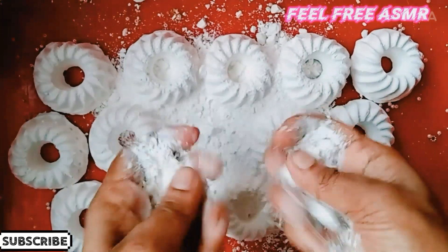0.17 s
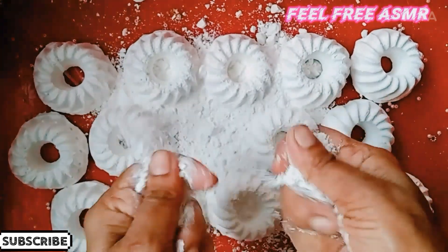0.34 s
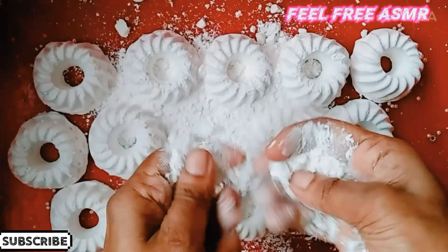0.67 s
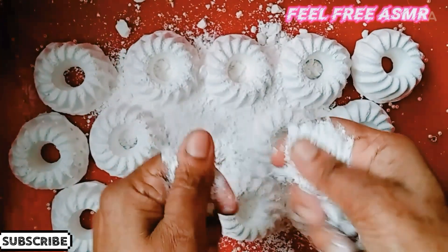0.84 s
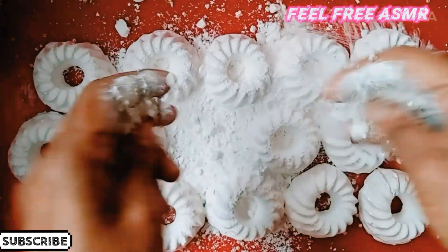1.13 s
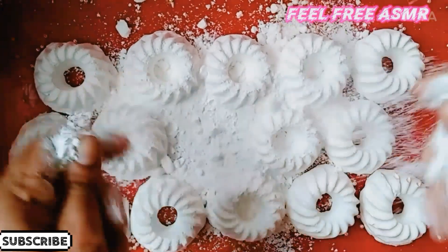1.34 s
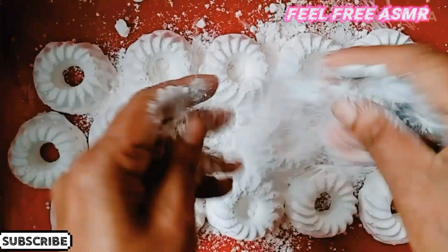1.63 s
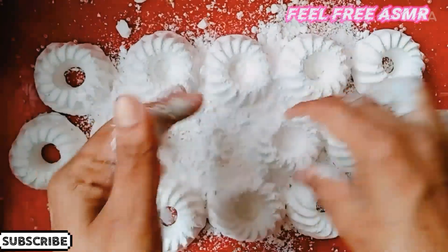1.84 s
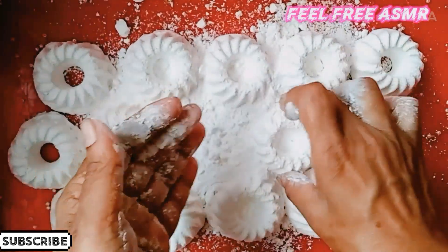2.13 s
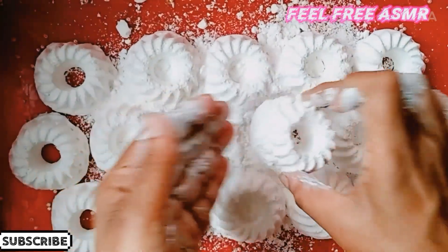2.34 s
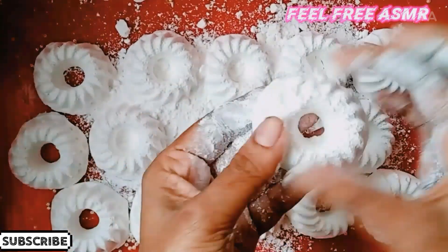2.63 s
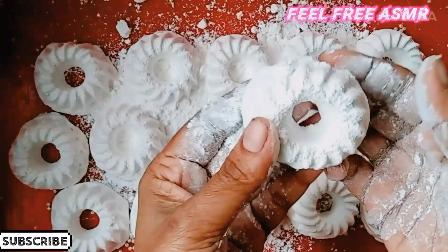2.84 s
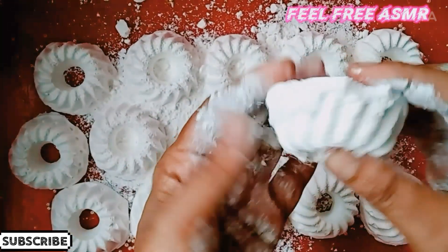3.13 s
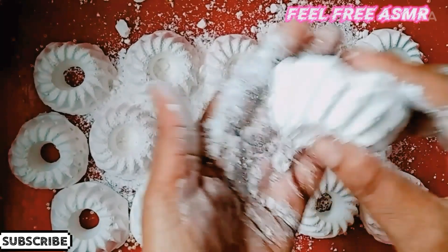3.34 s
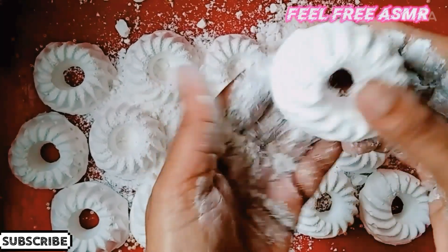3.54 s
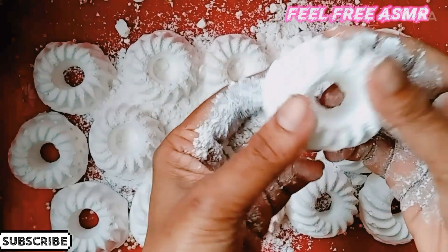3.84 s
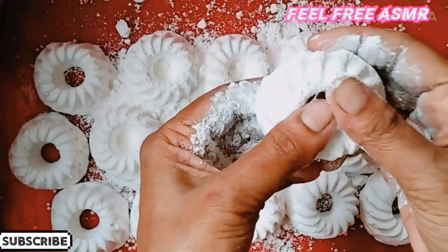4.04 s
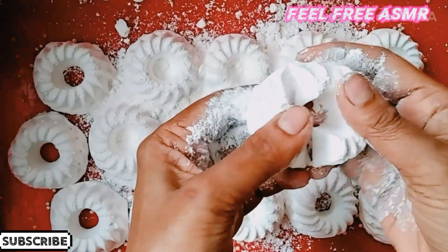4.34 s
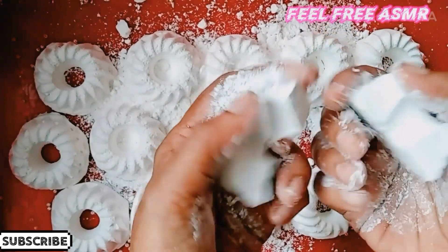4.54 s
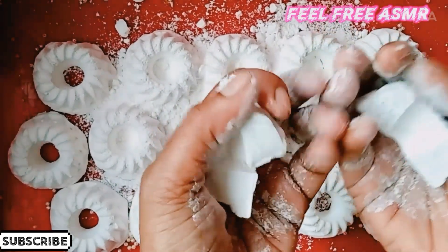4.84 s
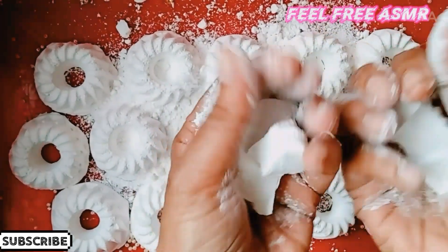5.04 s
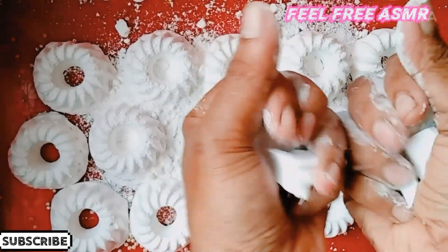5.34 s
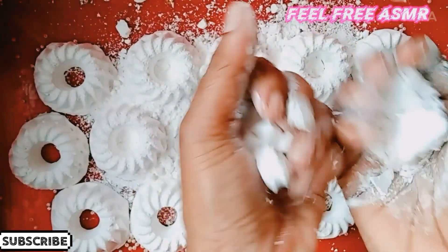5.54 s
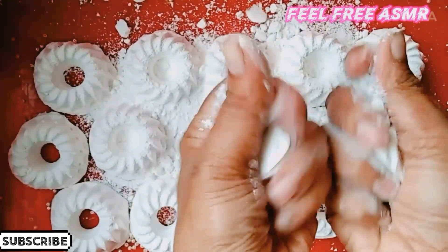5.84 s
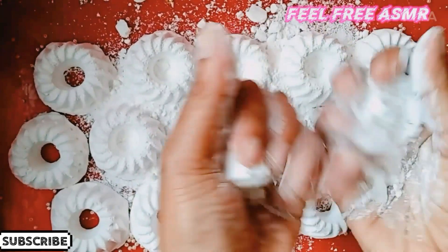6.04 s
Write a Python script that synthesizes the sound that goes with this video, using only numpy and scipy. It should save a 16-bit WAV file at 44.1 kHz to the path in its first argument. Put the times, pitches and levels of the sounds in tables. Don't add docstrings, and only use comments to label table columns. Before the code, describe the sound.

Irregular chalk crunches and plastic tray knocks come first, with gritty grinding and trickling crumbs. They stop, leaving steady high hiss and soft, whistling skin drags over ribbed chalk. A single break cracks midway, then rapid snapping and crackling bursts out, ending in loud hollow knocks and pattering grit. Close, dry indoor pickup with faint low hum.

```python
import sys
import numpy as np
from scipy import signal
from scipy.io import wavfile
from scipy.ndimage import uniform_filter1d

SR = 44100
rng = np.random.default_rng(int(sys.argv[2]) if len(sys.argv) > 2 else 0)


def natural_amplitude(level_db):
    exponent = np.asarray(level_db, float) / 20
    return 10 ** exponent


def transcribe(signal):
    frames = np.atleast_2d(signal).T
    limited = np.clip(frames, -1, 1)
    pcm = np.round(limited * 32767).astype(np.int16)
    wavfile.write(sys.argv[1], SR, pcm)


N = 272875

# [f/Hz, width/Hz, level/dB]
TRAY_MODES = [(555, 300, -14.5), (950, 87, 9.5), (1140, 83, -15)]
# [f/Hz, width/Hz, level/dB]
CHALK_MODES = [(1400, 500, 1), (1850, 550, 1), (2450, 700, -1), (3200, 900, -4), (4150, 900, -8)]
# [f/Hz, width/Hz, level/dB]
FIZZ_MODES = [(7500, 4030, 9), (9460, 3270, 9.5), (11830, 1100, 4), (14500, 1400, -22)]
# [t/s, knock peak/dB, crackle peak/dB, length/ms]
KNOCKS = [(.4917, -2, -17, 4.8), (0.5195, -13, -27, 2.7), (.527, -34, -28, 5.3), (0.5382, -24, -29, 8.2),
          (.6405, -10.5, -12.5, 2.96), (1.3194, -20, -12.5, 6.4), (1.3427, -16.5, -23, 1.6),
          (1.5838, -9.5, -9.5, 5.1), (1.8885, -9, -24, 6.3), (1.931, -22.5, -28.5, 17),
          (1.9541, -25, -28, 5), (2.0452, -8.5, -12.5, 3.5), (2.1134, -25.5, -24, 4.7),
          (2.178, -18, -28.5, 3.8), (2.188, -25, -39, 3.2), (2.1946, -23.5, -47, 4), (2.487, -17, -24, 2.4),
          (4.3, -11, -12, 1.6), (4.3036, -25.5, -36, 1.2), (5.217, -27, -20, 1.9), (5.315, -13, -8.5, 2.3),
          (5.4658, -11, -8, 1.27), (5.8468, -8, -18, 4.5), (5.858, -24, -45, 5.2),
          (5.9704, -28.5, -20, 1.9)]


def evened(x):
    return x / np.sqrt(np.mean(x ** 2) + 1e-20)


def read(points, hz):
    f, value = np.transpose(points)
    return np.interp(np.log(hz + 1), np.log(f + 1), value)


def level_course(rows):
    return np.interp(np.arange(N) / SR, *np.transpose(rows))


def add(mix, s, sound):
    part = mix[..., round(s * SR):][..., :sound.shape[-1]]
    part += sound[..., :part.shape[-1]]


def resonate(x, hz, width_hz):
    turn = np.exp(2j * np.pi * np.cumsum(hz * np.ones(x.shape[-1])) / SR)
    r = np.exp(-np.pi * width_hz / SR)
    return 2 * (turn * signal.lfilter([1 - r], [1, -r], x / turn)).real


def body(x, modes):
    out = 0
    for k, (hz, width_hz, db) in enumerate(modes):
        once = resonate(x, hz, width_hz)
        out = out + (-1) ** k * natural_amplitude(db) * resonate(once, hz, 1.7 * width_hz)
    return out


def lumps():
    # [t/s, crackle peak/dB, fizz peak/dB, length/ms, splinter f/Hz]
    snap_rows = [(.0066, -24, -44, 2.9, 1500), (0.042, -19, -54, 3.6, 1360),
                 (0.4511, -26.5, -36, 1.5, 2630), (0.6442, -9, -29, 1.7, 1720),
                 (1.387, -16, -26.5, 3, 1220), (1.473, -21, -22, 4.3, 2920),
                 (5.2645, -18.5, -52, 1.4, 3100), (5.286, -20, -50, 1.5, 2000),
                 (5.2913, -13.5, -37, 3.6, 2140), (5.2955, -24, -26, 3.4, 2470),
                 (5.3005, -14.5, -31, 1.2, 2320), (5.3356, -19, -52, 3.4, 1550),
                 (5.3458, -14.5, -48, 6.9, 1580), (5.3511, -8.5, -50, 1.2, 2300),
                 (5.36, -16.5, -54, 1.5, 1590), (5.395, -20.5, -50, 2, 2050), (5.3978, -27, -50, 3.4, 1440),
                 (5.4042, -27, -50, 3.3, 1610), (5.4306, -20, -36, 3.6, 2200),
                 (5.4401, -26, -35, 4.2, 1600), (5.4818, -21, -26.5, 1.8, 2300),
                 (5.9627, -34, -50, 3.3, 1820), (5.984, -32, -47, 1.8, 1600), (6.0107, -22, -50, 1.7, 1590)]
    # [t/s, peak/dB, f/Hz]
    chip_rows = [(.0468, -25, 1010), (0.0523, -31, 1140), (.263, -50, 1150), (0.2838, -34, 1180),
                 (.3075, -34, 1430), (.3125, -34, 795), (.362, -32, 810), (0.4226, -33.5, 890),
                 (0.704, -23, 630), (0.7085, -39, 485), (0.806, -38, 840), (0.8223, -38, 745),
                 (0.8903, -36, 830), (1.02, -32, 935), (1.178, -28, 970), (1.186, -29, 920),
                 (1.1924, -28, 870), (1.379, -36, 1270), (5.2606, -44, 1500), (1.5434, -31, 900),
                 (1.7323, -35, 1180), (1.7601, -32, 646), (1.787, -34.5, 770), (2.2013, -27, 450),
                 (2.491, -39, 1140), (2.8462, -32.5, 850), (2.892, -38, 750), (4.3126, -43, 1320),
                 (6.0062, -27, 890), (6.0655, -34, 820)]
    # [t/s, peak/dB, f/Hz]
    overtone_rows = [
        (0.6423, -28, 1220),
        (1.5852, -21, 1190),
        (2.0467, -15.5, 1750),
        (4.3014, -18.5, 1440),
        (5.318, -12, 2430),
        (5.8485, -8, 1170),
    ]
    knock_hz, knock_spread, knock_fizz_db = 870, .015, -21
    snap_knock_db = -6
    chip_ms, chip_crackle_db, chip_fizz_db = 3.1, -4.5, -17
    overtone_ms, overtone_crackle_db = 2.87, -34
    rows = []
    for s, db, crackle_db, ms in KNOCKS:
        hz = knock_hz * (1 + knock_spread * rng.standard_normal())
        rows.append((s, db, hz, crackle_db, crackle_db + knock_fizz_db, ms))
    for s, db, fizz_db, ms, hz in snap_rows:
        rows.append((s, db + snap_knock_db, hz, db, fizz_db, ms))
    for s, db, hz in chip_rows:
        rows.append((s, db, hz, db + chip_crackle_db, db + chip_fizz_db, chip_ms))
    for s, db, hz in overtone_rows:
        crackle_db = db + overtone_crackle_db
        rows.append((s, db, hz, crackle_db, crackle_db + knock_fizz_db, overtone_ms))
    return rows


def breaks():
    apart_low, apart_high = 0.065, 0.87
    out, t = np.zeros((2, N)), np.arange(900) / SR
    impulse = 1. * (t[None] == 0)
    tray, chalk, dust = (body(impulse, modes) for modes in (TRAY_MODES, CHALK_MODES, FIZZ_MODES))

    def ring(x, response):
        return signal.fftconvolve(x, response, axes=1)[:, :len(t)]

    lead = np.where(t < .0005, 1, .4)
    for s, knock_db, hz, crackle_db, fizz_db, ms in lumps():
        size, chance, grit = rng.standard_normal((3, 2, len(t)))
        cracks = size * (abs(chance) < .07)
        cracks[:, [8, 14]] = [[-1.38, 0.076], [-0.049, 0.48]]
        fading = np.exp(-(t / (1.07 * ms / 1000 + 1e-4)) ** 2)
        cracks, grit = cracks * fading, grit * fading
        blow, aside = cracks[0], cracks[1] * [[1], [-1]]
        low = lead * (blow + apart_low * aside)
        high = blow + apart_high * aside

        lump = body(low, [(hz, (60 + 600 / ms) * hz / 870, 0)])
        thump = body(low, [(hz, 900, -15)])
        knock = lump + thump + 0.14 * ring(low, tray)
        rise_ms = .025 * ms ** 2
        high = high * (1 - np.exp(-1000 * t / rise_ms))
        crackle = ring(high + .08 * grit, chalk)
        fizz = ring(high + .3 * grit, dust)
        for db, part in (knock_db + 2.5, knock), (crackle_db + 1.0, crackle), (fizz_db + 11.0, fizz):
            add(out, s, natural_amplitude(db) * part / abs(part.mean(0)).max())
    return out


def powder_flow():
    # [middle t/s, half length/s, grinding level/dB]
    squeeze_rows = [(.005, 0.071, -33.5), (0.325, 0.065, -36.5), (0.638, 0.18, -46), (1.182, 0.02, -39),
                    (1.38, 0.073, -36.5), (1.476, 0.24, -42), (1.727, 0.053, -42.5), (1.94, .03, -42),
                    (2.06, .03, -58), (2.11, .015, -40), (2.468, 0.037, -47), (5.318, 0.038, -31),
                    (5.412, 0.067, -34), (5.815, 0.075, -43), (5.968, 0.047, -41), (6.035, 0.035, -42)]
    # [t/s, level/dB]
    trickle_rows = [
        (0, -46),
        (1.03, -46),
        (1.1, -49.5),
        (1.6, -57),
        (1.85, -47),
        (2.2, -43.5),
        (2.3, -57.5),
        (5.15, -47),
        (5.7, -48.5),
        (6.19, -47.5),
    ]
    shower_db, shower_rise_s, shower_t60_s = -24, 0.0041, 0.36
    t, after = np.arange(N) / SR, np.arange(SR // 4) / SR
    trickle, squeeze, shower = natural_amplitude(level_course(trickle_rows)) ** 2, np.zeros(N), np.zeros(N)
    for s, half_s, db in squeeze_rows:
        squeeze += natural_amplitude(db) ** 2 * np.exp(-2 * abs(t - s) ** 1.53 / half_s ** 1.485)
    for s, db, *_ in KNOCKS:
        fall = natural_amplitude(db + shower_db - 60 * after / shower_t60_s)
        add(shower, s, (fall * (1 - np.exp(-after / shower_rise_s))) ** 2)
    tray = trickle * natural_amplitude(-1.0) + shower + squeeze
    palm = trickle + squeeze + shower * natural_amplitude(-35.5)
    return 10 * np.log10([tray, palm])


def crumbs():
    per_s, spread_db, clump_db = 2000, 5., 3.
    tray_db, palm_db = powder_flow()
    clumps = uniform_filter1d(rng.standard_normal(N), size=300)
    clumps = evened(uniform_filter1d(clumps, size=300))
    size = natural_amplitude(spread_db * np.minimum(rng.exponential(1, (2, N)), 4) + clump_db * clumps)
    signs, hits = rng.choice([-1, 1], (2, N)), rng.random((2, N)) < per_s / SR
    on_tray, in_palm = size * signs * hits
    low = evened(body(on_tray, TRAY_MODES) + .5 * body(on_tray, [(865, 1620, 0)]))
    high = evened(body(in_palm, CHALK_MODES) + natural_amplitude(-13) * body(in_palm, FIZZ_MODES))

    def over(db, floor_db):
        return np.sqrt(np.maximum(natural_amplitude(db) ** 2 - natural_amplitude(floor_db) ** 2, 1e-8))

    return over(tray_db - 2.0, -51.5) * low + over(palm_db + 0.5, -48.0) * high


def slides():
    # [t/s, length/s, final f/Hz, level/dB]
    slide_rows = [(2.738, 0.083, 2040, -54.5), (2.935, 0.39, 2720, -57), (3.118, .092, 2350, -57),
                  (3.232, .27, 3270, -58), (3.48, .21, 1980, -53), (3.652, .25, 3320, -47),
                  (3.725, 0.2, 1950, -50.5), (3.88, 0.2, 2150, -52.5), (4.098, 0.2, 2380, -51),
                  (4.382, 0.29, 2230, -50), (4.795, 0.29, 2910, -50), (4.889, .13, 2160, -53),
                  (5.621, 0.39, 2780, -50.5), (6.119, 0.17, 3050, -54)]
    sink_hz, width_hz = 280, 294 * 1.5
    out = np.zeros((2, N))
    for s, length_s, last_hz, db in slide_rows:
        u = np.arange(0, 1, 1 / SR / length_s)
        common, *own = rng.standard_normal((3, SR // 2))[..., :len(u)]
        hz = last_hz + sink_hz * (1 - u) ** 2.2
        friction = 0.46 * common + np.array(own)
        band = resonate(resonate(friction, hz, width_hz), hz, width_hz)
        add(out, s, natural_amplitude(db + 7.0) * evened(band) * np.sin(np.pi * u ** 0.53))
    return out


def thuds():
    # [t/s, f/Hz, t60/s, level/dB]
    bump_rows = [
        (2.178, 131, 0.18, -17),
        (2.178, 212, 0.092, -13),
        (2.179, 345, 0.093, -9.5),
        (2.18, 425, 0.049, -4),
        (2.18, 605, 0.06, -14),
        (4.299, 142, 0.02, -3),
        (5.299, 302, 0.09, -24),
        (5.849, 422, 0.1, -18),
        (6.12, 138, 0.038, -12),
    ]
    out, t = np.zeros(N), np.arange(8000) / SR
    for s, hz, t60_s, db in bump_rows:
        rise = 1 - np.exp(-t / 0.026)
        add(out, s, natural_amplitude(db - 60 * t / t60_s) * np.sin(2 * np.pi * hz * t) * rise)
    return out * natural_amplitude(np.array([[3.], [-6.]]))


def room(x):
    # [f/Hz, t60/s]
    decay_rows = [
        (300, 0.068),
        (1000, 0.03),
        (3000, 0.11),
        (9000, 0.046),
    ]
    taps = np.zeros((2, 12000))
    at = np.arange(60, 11960, 20) + rng.integers(0, 20, (2, 595))
    np.put_along_axis(taps, at, rng.choice([-1., 1.], at.shape), 1)
    hz, t, z = signal.stft(taps, SR, nperseg=128)
    z = z * natural_amplitude(-60 * t / read(decay_rows, hz)[:, None])
    tail = signal.istft(z, SR, nperseg=128)[1]
    return signal.fftconvolve(x[None], tail / np.linalg.norm(tail[0]), axes=1)[:, :N]


def noise(colour, level_db, patchy_db):
    # [f/Hz, correlation]
    likeness = [(60, 0.92), (130, 0.82), (280, 0.34), (590, 0.42), (1280, -0.053), (4300, -0.063),
                (7200, 0.8), (12700, 0.45)]
    # [f/Hz, level/dB]
    left_over = [(60, 25), (130, 11), (280, 16), (590, 0), (1280, -0.5), (2750, -1), (5900, 0), (12700, 2)]
    frames, hz = N // 256 + 5, np.fft.rfftfreq(1024, 1 / SR)
    a, b, c, d, patches = rng.standard_normal((frames, 513, 5)).T
    patches = uniform_filter1d(patches, size=14, axis=0)
    patches = evened(uniform_filter1d(patches, size=8, axis=1))
    same = np.clip(read(likeness, hz), -1, 1)[:, None]
    left = a + 1j * b
    right = same * left + np.sqrt(1 - same ** 2) * (c + 1j * d)
    z = np.array([left, right]) * natural_amplitude(read(colour, hz)[:, None] + patchy_db * patches)
    z[1] /= natural_amplitude(read(left_over, hz))[:, None]
    x = signal.istft(z, nperseg=1024, noverlap=768)[1][:, :N]
    return natural_amplitude(level_db) * x / np.std(x.mean(0))


def hiss():
    # [t/s, level/dB]
    hiss_level = [(0, -35), (.17, -30.5), (.23, -32.5), (.63, -38), (.68, -38), (1.43, -34.5),
                  (2.15, -35.5), (2.45, -33), (2.49, -35.5), (2.53, -34), (4.1, -32.5), (5.15, -33.5),
                  (5.28, -35.5), (5.46, -36.5), (5.51, -35.5), (5.64, -34), (5.75, -36.5), (5.82, -36)]
    # [f/Hz, density/dB]
    hiss_colour = [(2350, -112), (4000, -22.5), (5810, -6), (6740, 2), (7670, 5.5), (8470, -1), (9220, -11),
                   (11600, -18.5), (12400, -16.5), (13100, -40), (13500, -95)]
    return noise(hiss_colour, level_course(hiss_level) + 0.51, 1.84)


def hum():
    # [f/Hz, density/dB]
    hum_colour = [(15, -58), (25, -23), (71, -5.5), (113, 3), (172, 2), (286, -5), (382, -0.5), (446, -7),
                  (830, -11), (1350, -16), (2110, -13), (3510, -13), (5000, -7), (6500, -7.5),
                  (11000, -120)]
    return noise(hum_colour, -43, 1.0)


def scene():
    snaps, powder = breaks(), crumbs()
    near = snaps + powder + room(natural_amplitude(-12) * snaps.mean(0) + powder)
    high_pass = signal.butter(2, 300, "high", fs=SR, output="sos")
    near = signal.sosfilt(high_pass, near) * natural_amplitude(np.array([[.4], [-.4]]))
    return near + slides() + thuds() + hiss() + hum()


def gate(x):
    # [f/Hz, share of time shut]
    shut_share = [(1500, 0), (2600, .08), (3600, .2), (4400, .22), (5200, 0), (8600, 0), (9200, .12),
                  (10500, .24), (12000, .36), (12900, .6), (13300, .95)]
    wobble_db = 5.5
    hz, t, z = signal.stft(x, SR, "cosine", 2048, 1024)
    band = np.floor(np.log(hz + 300) * 22).astype(int)
    band = np.unique(band, return_inverse=True)[1]
    power = (np.arange(band.max() + 1)[:, None] == band) @ (abs(z) ** 2).sum(0)
    wobble = evened(uniform_filter1d(rng.standard_normal(power.shape), size=2, axis=1))
    level_db = 10 * np.log10(uniform_filter1d(power, size=2, axis=1) + 1e-20) + wobble_db * wobble
    level_db[-14:] -= uniform_filter1d(level_db[-14:], size=25, axis=1)
    rank = level_db.argsort(1).argsort(1) / len(t)
    is_open = rank[band] >= read(shut_share, hz)[:, None]
    return signal.istft(z * is_open, SR, "cosine", 2048, 1024)[1][:, :N]


def top_cut(x):
    return signal.sosfilt(signal.butter(12, 15300, fs=SR, output="sos"), x)


def record(dry):
    limited = .58 * np.tanh(dry / .58)
    return top_cut(gate(limited))


dry = scene()
out = record(dry)
transcribe(out)
```